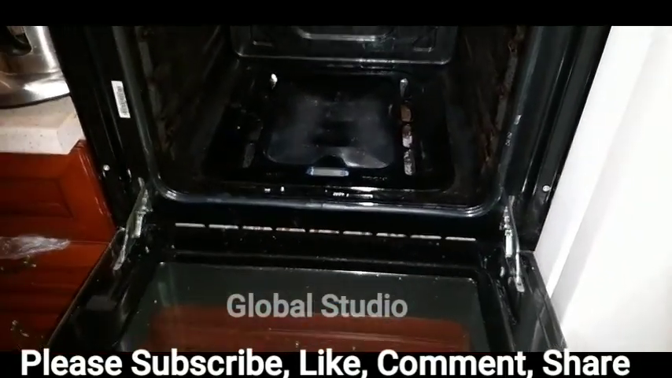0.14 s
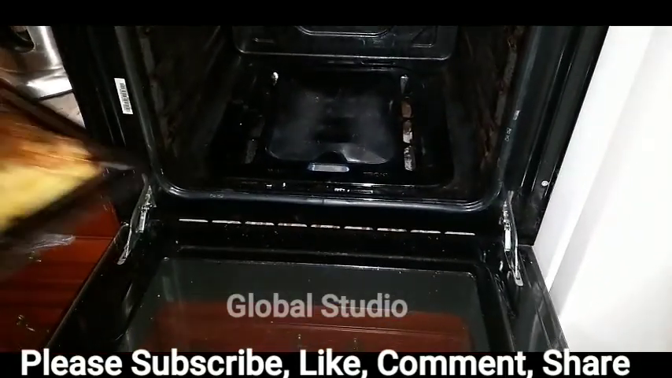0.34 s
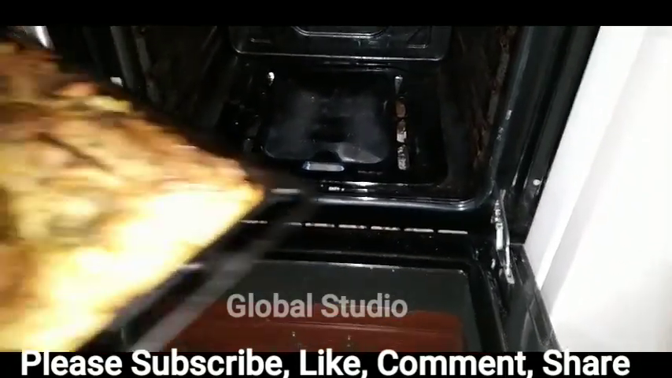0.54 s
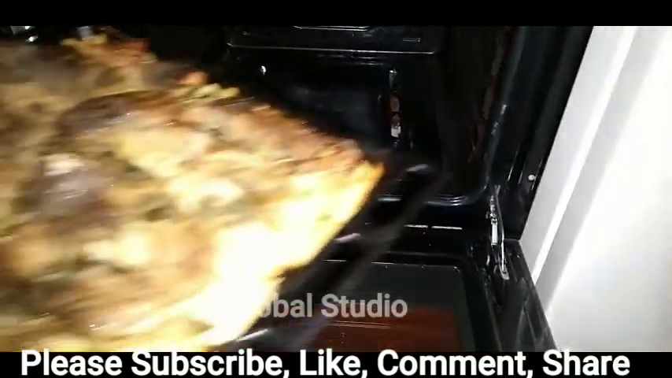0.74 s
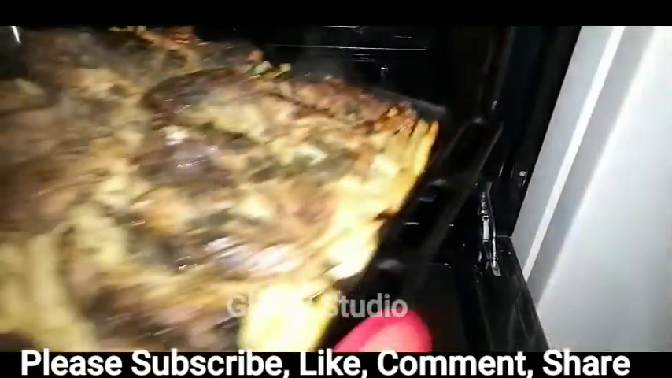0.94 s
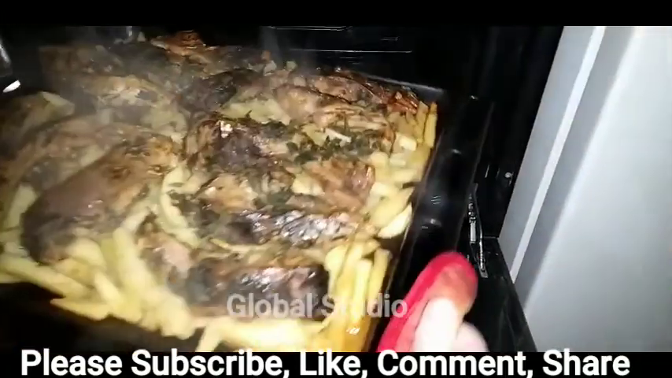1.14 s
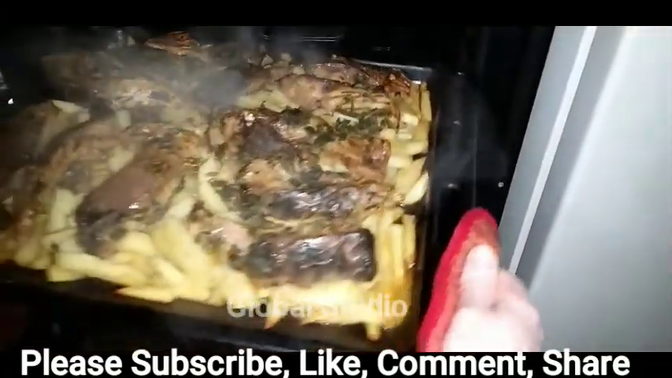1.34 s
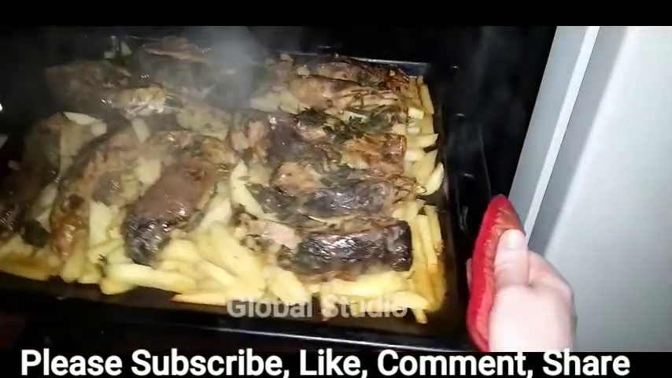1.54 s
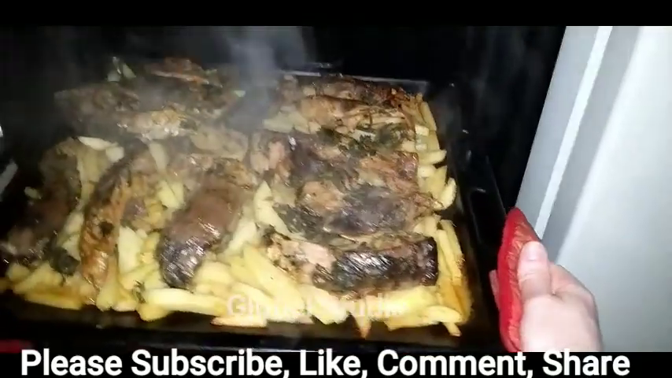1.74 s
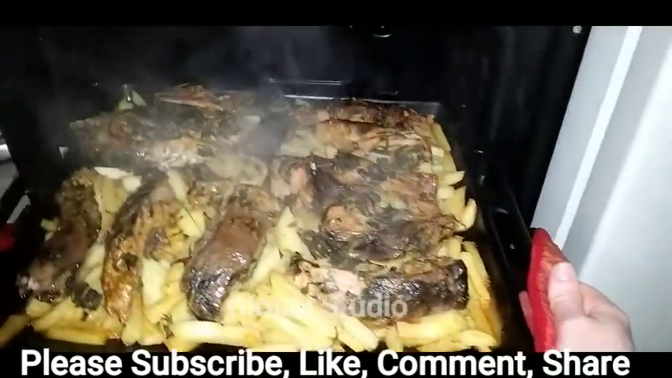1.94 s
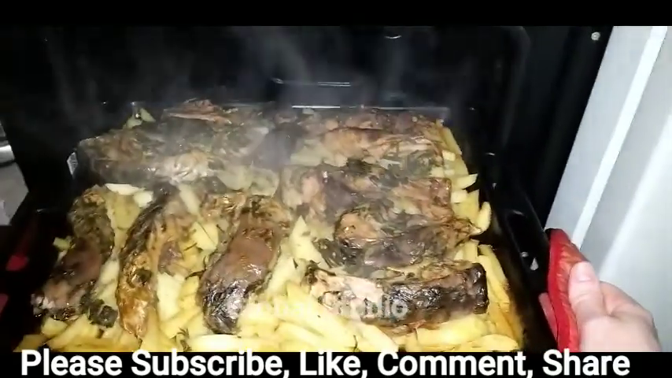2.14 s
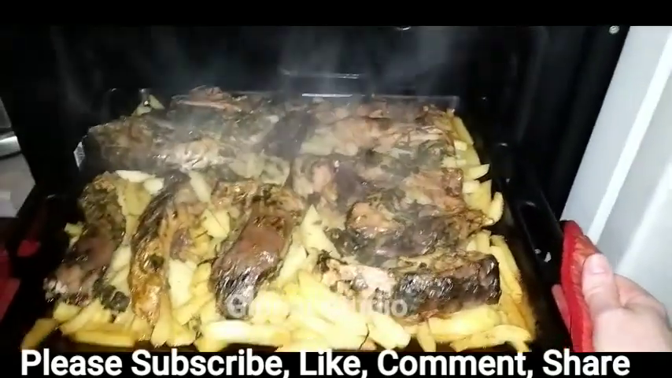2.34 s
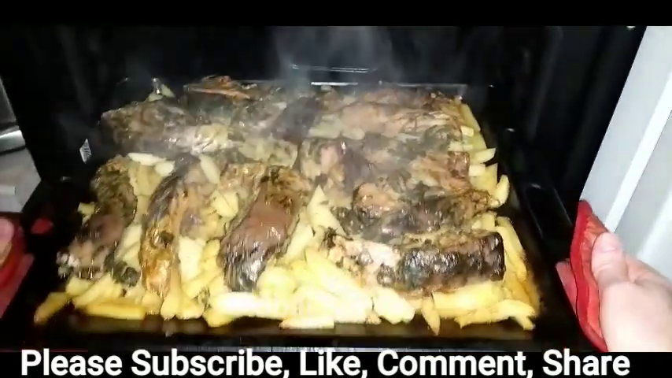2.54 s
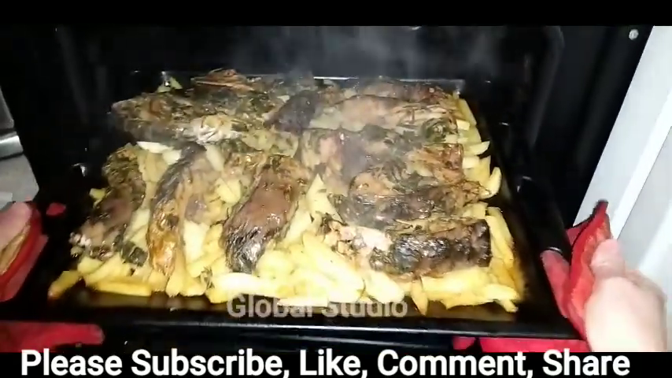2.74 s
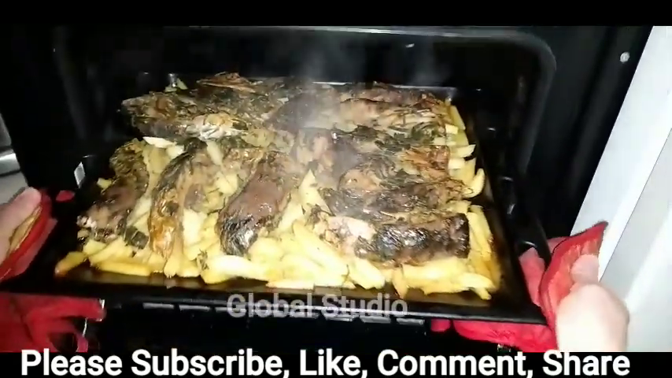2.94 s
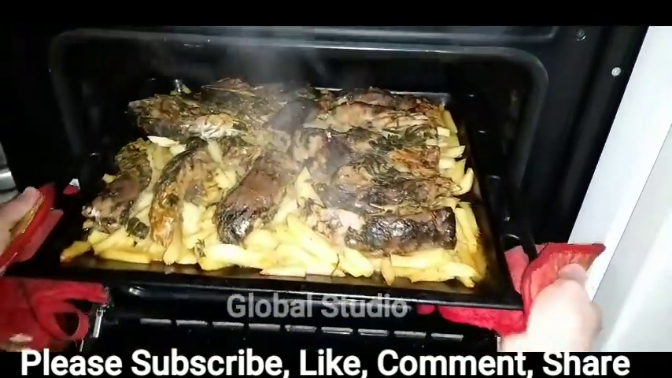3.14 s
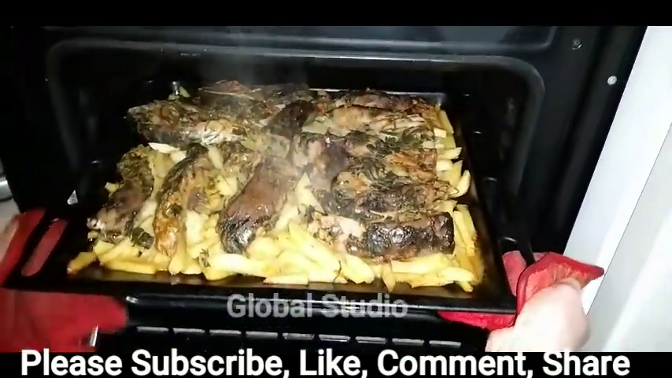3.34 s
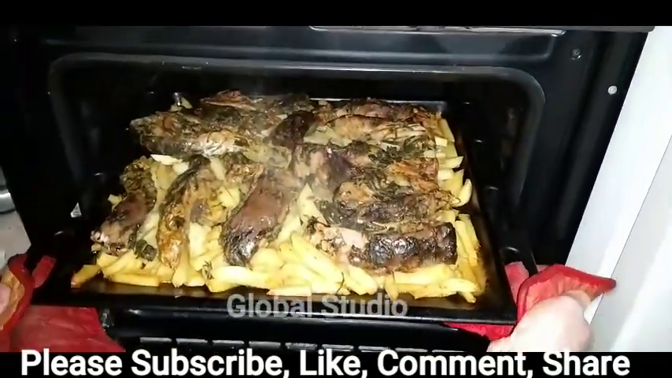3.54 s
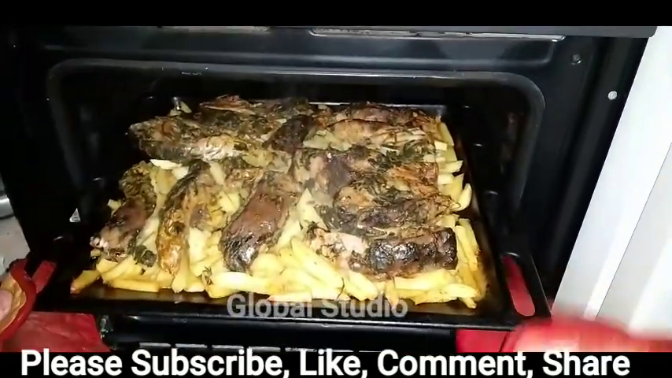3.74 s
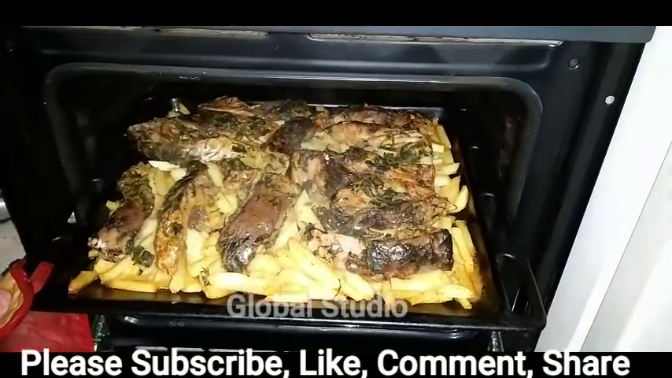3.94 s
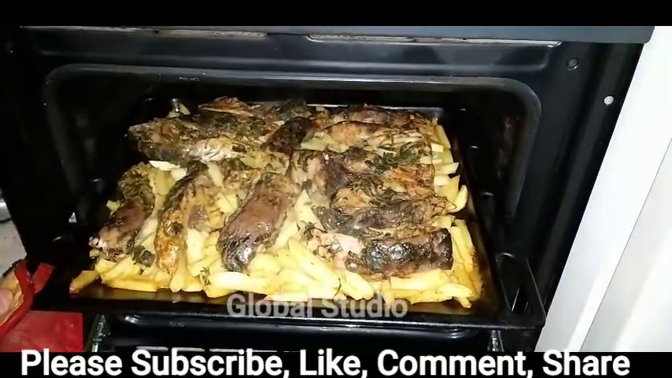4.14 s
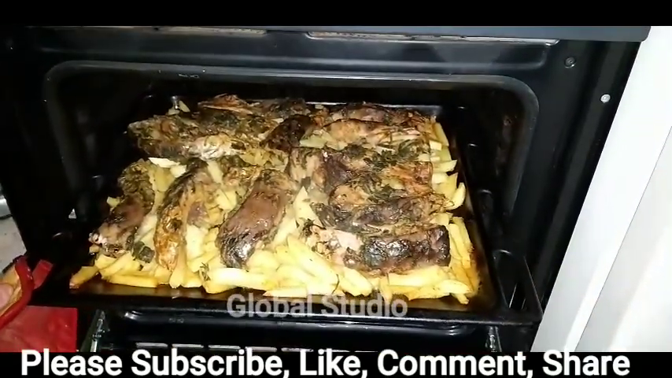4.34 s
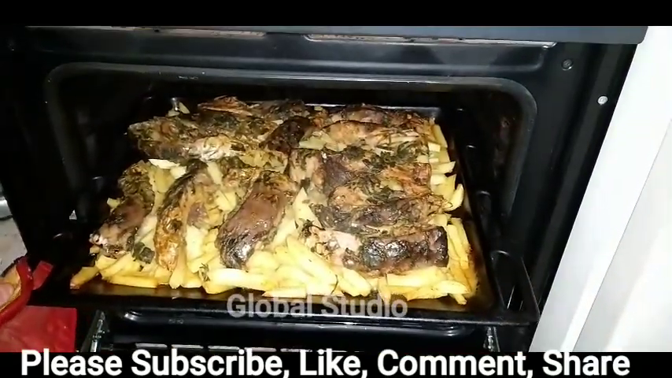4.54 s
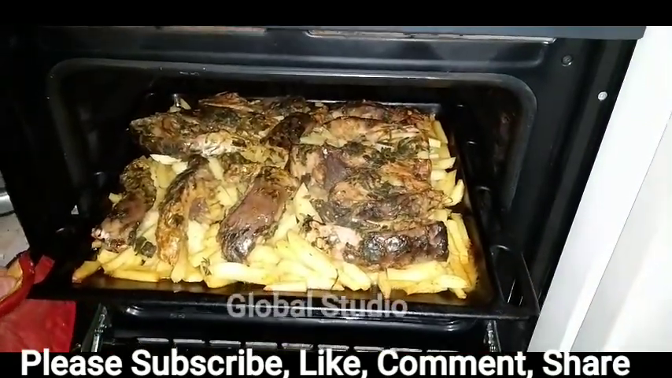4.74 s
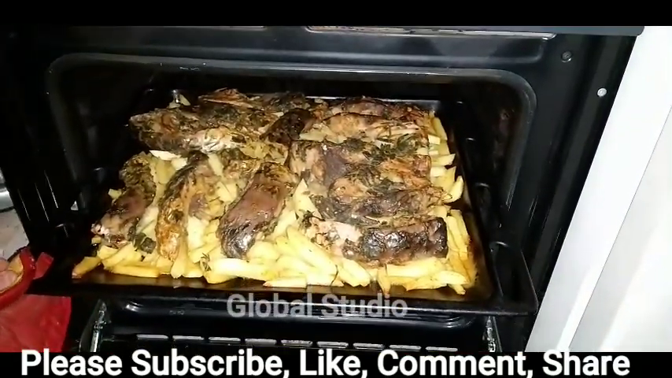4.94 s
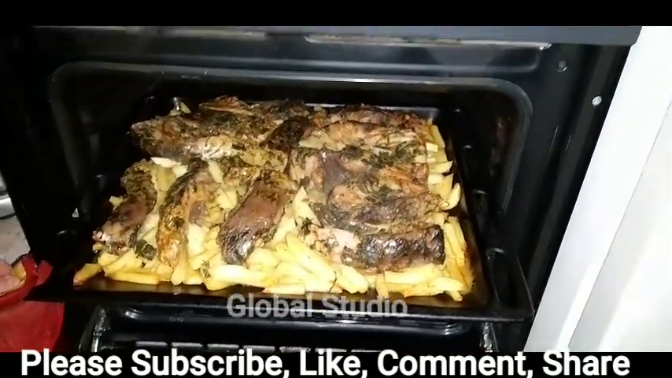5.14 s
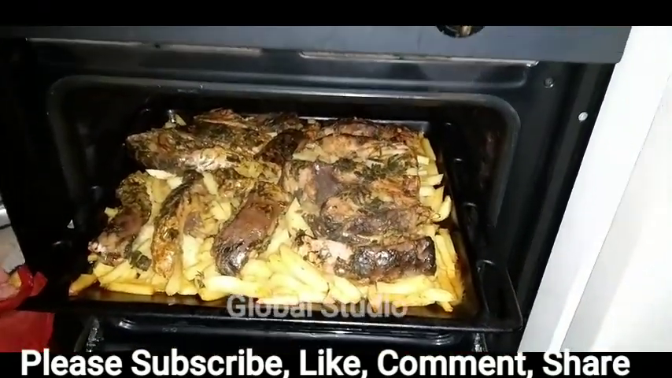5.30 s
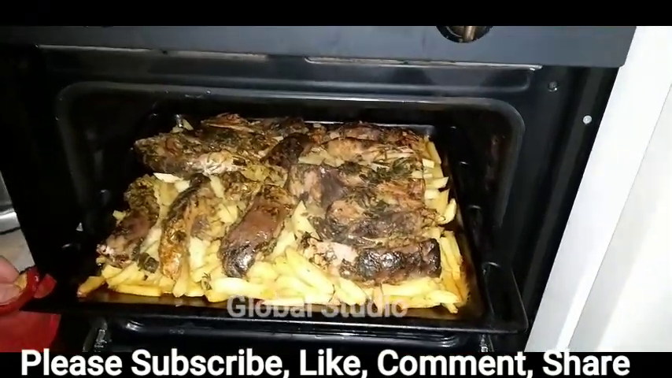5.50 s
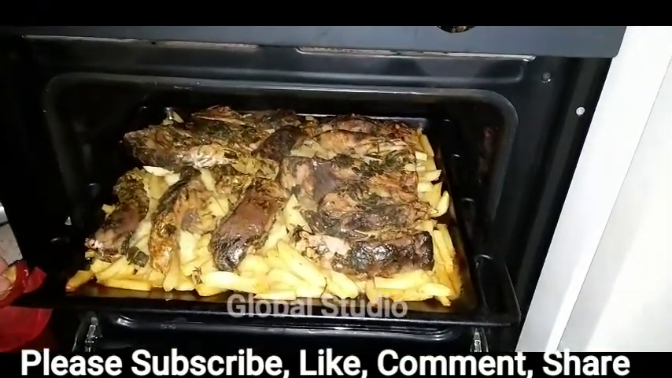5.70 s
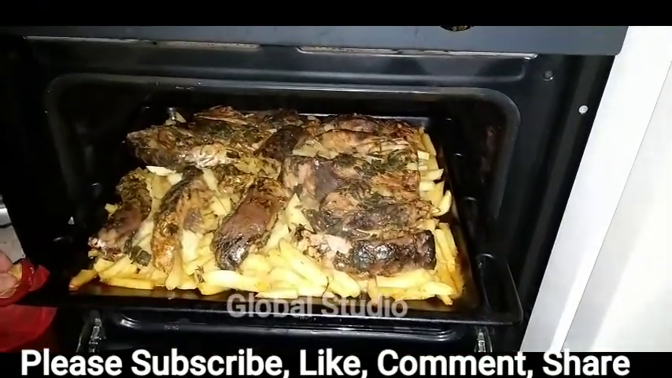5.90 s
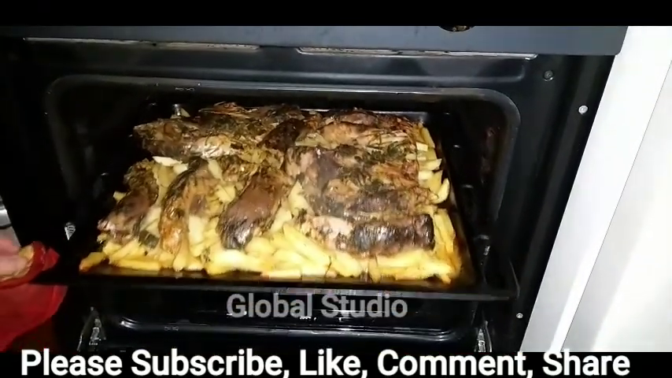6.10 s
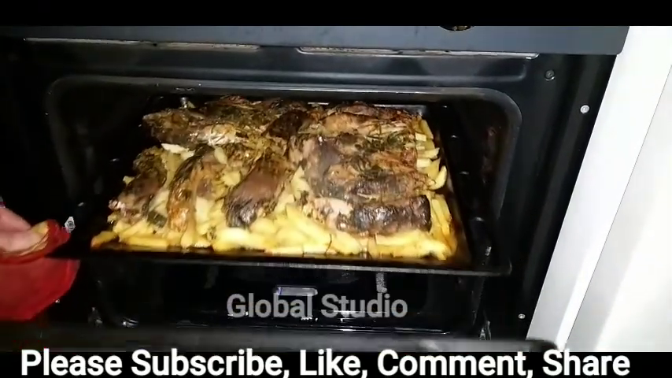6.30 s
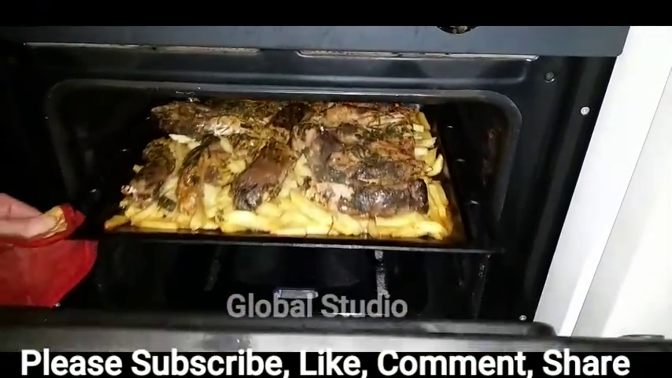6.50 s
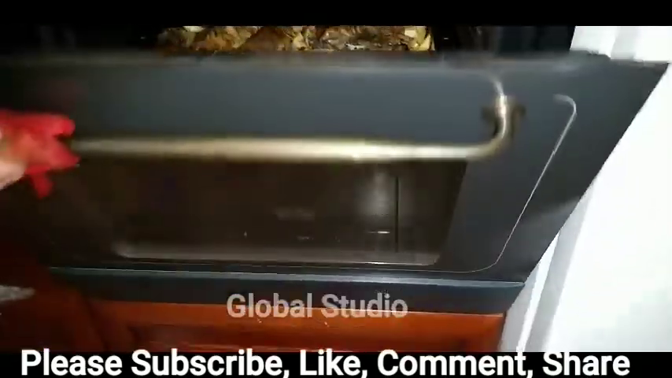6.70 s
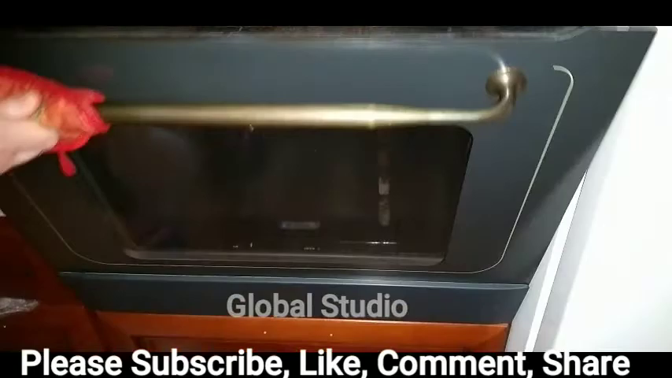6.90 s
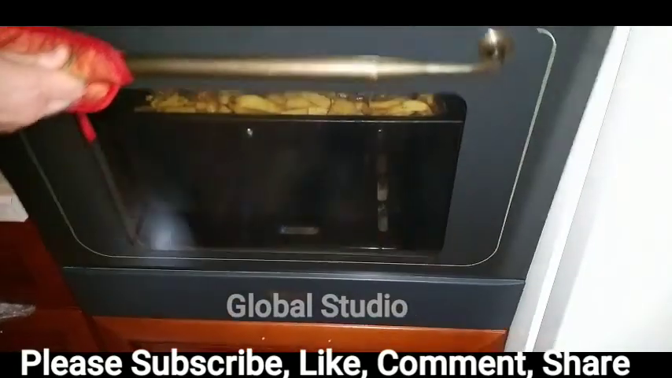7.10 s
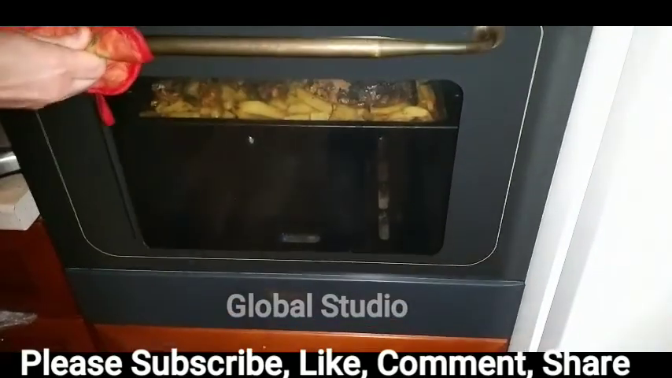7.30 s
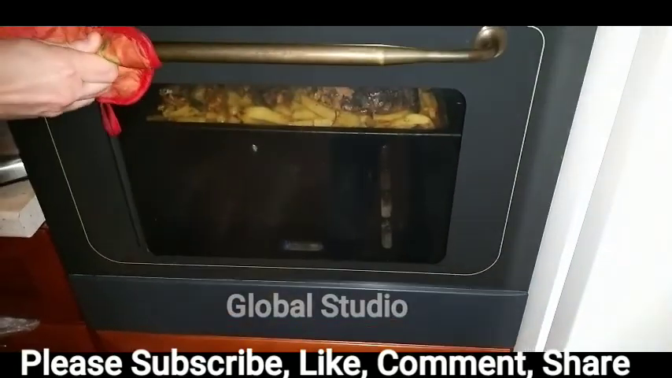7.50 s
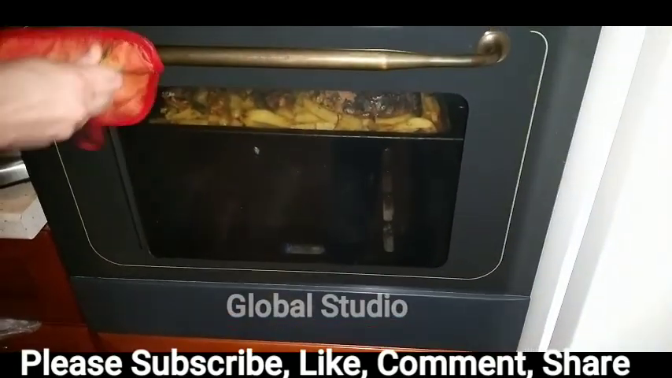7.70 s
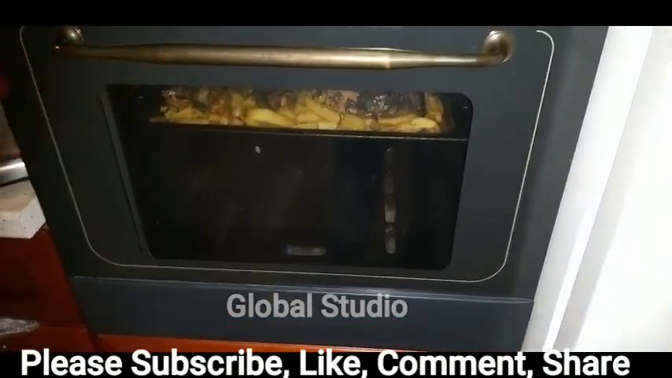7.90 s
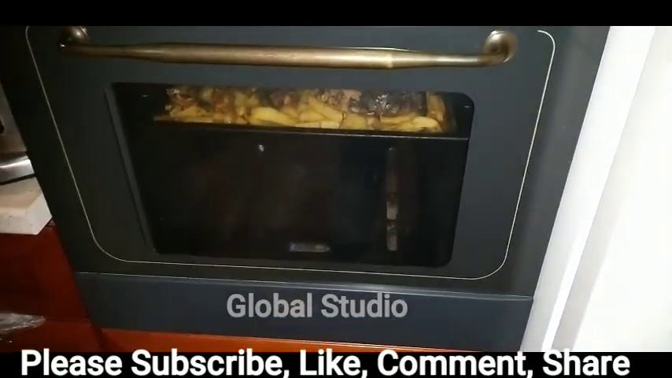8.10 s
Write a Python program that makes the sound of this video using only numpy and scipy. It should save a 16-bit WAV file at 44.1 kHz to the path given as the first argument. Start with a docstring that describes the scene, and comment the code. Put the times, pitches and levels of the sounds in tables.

```python
"""Baking tray into a hot oven

A loaded tray is knocked onto the runners and scrapes home in two spells: modes and dense clatter ring
at each blow, and slips of enamel drive ringing noise. Mitts rustle as brushed bands of noise, hinges
clunk, panels thud, and the sprung door slams and rattles in a small kitchen. Fan hum of wavering sines
sinks away as the door closes; its air and swish are shaped noise. Two close-set microphones listen."""
import sys
import numpy as np
from scipy import signal
from scipy.fft import rfft, irfft, next_fast_len
from scipy.io import wavfile

SR = 44100
rng = np.random.default_rng(int(sys.argv[2]) if len(sys.argv) > 2 else 0)


def output_pcm(signal):
    """Save a mono or channel-first signal as 16-bit PCM at the path in sys.argv[1].

    Samples are clipped to [-1, 1] before scaling.
    """
    pcm = np.clip(np.atleast_2d(signal).T, -1, 1) * 32767
    wavfile.write(sys.argv[1], SR, np.round(pcm).astype(np.int16))


N = 359591
TIME = np.arange(N) / SR  # s

# thump, clang, clink and tick registers: lower_edge_hz, upper_edge_hz
REGISTERS = [(25, 400), (400, 2150), (2150, 6000), (6000, 17000)]
MIC_GAP_M, SOUND_M_PER_S = 0.11, 343
DIRECT_SHARE = 0.067  # part of the sound that reaches both microphones alike
BASS_MONO_HZ = 213  # below this the two microphones hear nearly the same


def amp(db):
    """Amplitude factor of a level in dB."""
    return 10 ** (np.asarray(db) / 20)


def evened(x):
    """Signal scaled to unit RMS."""
    return x / np.sqrt(np.mean(x ** 2) + 1e-30)


def add(mix, start_s, sound):
    """Lay a sound into the mix, cut off at the end."""
    part = mix[:, round(start_s * SR):][:, :sound.shape[-1]]
    part += sound[..., :part.shape[-1]]


def colour(hz, spectrum, peaks=()):
    """Gain of a broad spectrum with resonances standing out of it."""
    f, db = np.transpose(spectrum)
    broad_db = np.interp(np.log(hz + 1), np.log(f + 1), db)
    humps_db = sum(height / (1 + (2 * (hz - centre) / width) ** 2) for centre, width, height in peaks)
    return amp(broad_db + humps_db)


def ragged(hz, depth_db, spacing_hz):
    """Gain of a thin panel's many small resonances, scattered at random."""
    heights_db = depth_db * np.clip(rng.standard_normal(2048), -2, 2)
    return amp(np.interp(hz / spacing_hz, np.arange(len(heights_db)), heights_db))


def register(hz, index):
    """Gain of one register, with soft edges."""
    low, high = REGISTERS[index]
    return 1 / np.sqrt((1 + (low / (hz + 1)) ** 8) * (1 + (hz / high) ** 8))


def noise(gain):
    """Coloured noise, partly direct and partly from all sides: fully alike at both microphones only in the bass."""
    hz = np.linspace(0, SR / 2, len(gain))
    diffuse = np.sinc(2 * hz * MIC_GAP_M / SOUND_M_PER_S)
    treble = hz ** 2 / (hz ** 2 + BASS_MONO_HZ ** 2)
    apart = (1 - DIRECT_SHARE) * (1 - diffuse) * treble
    a, b, c, d = rng.standard_normal((4, len(gain)))
    mid = (a + 1j * b) * np.sqrt(2 - apart)
    side = (c + 1j * d) * np.sqrt(apart)
    return evened(irfft(np.array([mid + side, mid - side]) * gain))


def wander(rate):
    """Slow chance of unit size, changing about rate times a second."""
    hz = np.fft.rfftfreq(4096, N / 4096 / SR)
    slow = irfft(rfft(rng.standard_normal(4096)) / (1 + (hz / rate) ** 4))
    return np.interp(TIME, np.linspace(0, N / SR, len(slow)), evened(slow))


def curve(rows, index):
    """One column of a curve over time, holding its end values."""
    rows = np.array(rows)
    return np.interp(TIME, rows[:, 0], rows[:, index])


def swell(peak_s, length_s):
    """A rub swells smoothly to its height and trails off."""
    t = (TIME - peak_s) / length_s
    rise, fall = 0.48, 0.76  # shares of the length
    return np.exp(-np.minimum(np.where(t < 0, (t / rise) ** 2, t / fall), 20))


def long_bins():
    """Frequencies in Hz for noise that lasts the whole scene."""
    return np.linspace(0, SR / 2, next_fast_len(N // 2 + 1) + 1)


def fan(air_db=-55, waver_hz=1.98, throb_db=3.0):
    """Wavering, throbbing hum lines over air that rushes through the oven's cavity."""
    # hum before its common fade: pitch_hz, level_db
    lines = [(96.9, -61.5), (123.8, -68.5), (145.3, -60), (166.9, -62.5), (199.2, -65), (290.7, -67.5),
             (527.6, -66)]
    # balance of the rushing air: frequency_hz, level_db_per_hz
    air_tone = [(25, -17), (55, -20), (82, -6), (150, 1.5), (227, -8), (297, -15.5), (400, -18.5),
                (523, -15.5), (700, -26.5), (1000, -28), (1900, -32.5), (2700, -41.5), (8000, -43),
                (15500, -44)]
    # resonances of the oven's cavity: centre_hz, width_hz, height_db
    cavity = [(304.5, 23, 8), (587.3, 13, 11.5), (1030, 110, 2), (1480, 100, 7.5), (2110, 270, 2.5)]
    # push to the middle of the air, whose factor is then lowered by 1.5: time_s, level_db
    rush_push = [(0, 7), (1.2, 6), (2.2, 10), (3.6, 10), (6.6, 7), (7.05, 1.5), (7.8, 7)]
    hz = long_bins()
    hum = np.zeros(N)
    for pitch_hz, level_db in lines:
        level = amp(level_db + throb_db * wander(9.7))
        phase = 2 * np.pi * np.cumsum(pitch_hz + waver_hz * wander(9.4)) / SR
        hum += level * np.sin(phase)
    air = noise(colour(hz, air_tone, cavity))
    # the middle of the air, between 450 and 4500 Hz, swells and sinks
    middle = 1 / (1 + (450 / (hz + 1)) ** 4) / (1 + (hz / 4500) ** 4)
    rush = irfft(rfft(air) * middle)[:, :N]
    air = air[:, :N] + rush * (amp(curve(rush_push, 1)) - 1.5)
    # from 6.66 s the hum sinks away by 17 dB per s as the door closes
    hum_db = 1.5 - 17 * np.maximum(TIME - 6.66, 0)
    return amp(hum_db) * hum + amp(air_db) * air


def swish(turns_hz=24.1, depth=0.52, drift_per_s=6):
    """The fan wheel brushes the air unevenly, swishing once a turn in resonances that come and go."""
    # resonances of the swish: centre_hz, width_hz, level_db, drift_db
    resonances = [(1490, 107, -77, 3.5), (2120, 75, -87.5, 3.5), (6830, 1500, -82.5, 4.5)]
    hz = long_bins()
    turn = np.exp(depth * np.cos(2 * np.pi * turns_hz * TIME))
    bands = np.zeros((2, N))
    for centre, width, level_db, drift_db in resonances:
        level = amp(level_db + drift_db * np.clip(wander(drift_per_s), -2, 2))
        bands += level * noise(1 / (1 + (2 * (hz - centre) / width) ** 4))[:, :N]
    return evened(turn) * bands


def mitts(flutter_db=1.5, stir_db=0.5):
    """Cloth brushes in separate strokes of rasp and hiss, and stirs faintly between them."""
    # mitts and sleeves brush along: peak_s, length_s, level_db, extra_hiss_db
    rustles = [(0.495, 0.077, -84, 10), (0.713, 0.15, -71.5, -1), (0.95, 0.11, -80, 13),
               (1.34, 0.5, -83, 13.5), (1.85, .13, -55.5, -11.5), (3.588, 0.074, -55.5, -4.5),
               (3.694, 0.32, -67, 2), (3.928, 0.21, -63, -6), (4.386, 0.037, -62.5, 0),
               (4.632, 0.24, -67, -7), (5.147, 0.36, -72.5, -22), (5.465, 0.14, -67.5, -17),
               (5.754, 0.024, -65.5, -19), (7.718, 0.081, -57, -11), (8.14, 0.28, -61.5, -1)]
    # balance of rubbed cloth: frequency_hz, level_db_per_hz
    cloth = [(2000, 0.5), (3500, 2), (6000, -6.5), (9000, -11), (13000, -8), (15500, -12.5)]
    hz = long_bins()
    rasp, hiss = (noise(colour(hz, cloth) * register(hz, k))[:, :N] for k in (2, 3))
    # the faint stir lasts while the tray is handled
    handling = (TIME > 0.5) & (TIME < 6.6)
    stir = amp(-83 + stir_db * wander(2)) * handling
    rasp_power, hiss_power = stir ** 2, stir ** 2
    for peak_s, length_s, level_db, extra_hiss_db in rustles:
        power = (amp(level_db) * swell(peak_s, length_s)) ** 2
        rasp_power = rasp_power + power
        hiss_power = hiss_power + power * amp(extra_hiss_db) ** 2
    brushed = rasp * np.sqrt(rasp_power) + hiss * np.sqrt(hiss_power)
    return amp(flutter_db * wander(40)) * brushed


def blows(rows, modes, ring, decay, modes_db, lowest_hz, tick_db, spot_db=5.0, spot_width=0.66):
    """Each blow rings clear modes and a dense sheet-metal clatter, which the kitchen draws out."""
    t, hz = np.arange(2 ** 15) / SR, np.fft.rfftfreq(2 ** 15, 1 / SR)
    out = np.zeros((2, N))
    panel = ragged(hz, depth_db=2.5, spacing_hz=21.9)
    for k, (rise, t60, dense_db, room_db, room_t60) in enumerate(decay):
        low, high = REGISTERS[k]
        clear = np.zeros((2, len(t)))
        for f, db, life in modes:
            if low <= f < high:
                # each mode arrives from its own direction
                lag = np.array([[-.5], [.5]]) * rng.uniform(-1, 1) * MIC_GAP_M / SOUND_M_PER_S
                lag *= f / np.hypot(f, BASS_MONO_HZ)
                # it takes about a third of a cycle to get going
                envelope = amp(db - 60 * t / life) * (1 - np.exp(-3 * f * t))
                clear += envelope * np.sin(2 * np.pi * f * (t + lag))
        near = amp(dense_db) * np.exp(-np.log(1000) * t / t60) * (1 - np.exp(-t / rise))
        room = amp(room_db) * np.exp(-np.log(1000) * t / room_t60) * (1 - np.exp(-t / 0.0093))
        edges, fade = panel * register(hz, k), np.hypot(near, room)
        for start_s, strength_db, weight_db, hardness_db, spot_hz in rows:
            # weight adds thump; a hard contact adds clink and tick together
            hard_db = strength_db + hardness_db
            levels_db = (strength_db + weight_db, strength_db, hard_db, hard_db + tick_db)
            struck_spot = [(spot_hz, spot_width * spot_hz, spot_db)]
            dense = noise(edges * colour(hz, ring, struck_spot))
            add(out, start_s, amp(levels_db[k]) * (amp(modes_db) * clear + fade * dense))
    # the blows carry little deep bass
    thin = signal.butter(2, lowest_hz, "highpass", fs=SR, output="sos")
    return signal.sosfilt(thin, out)


def tray_knocks():
    """The loaded tray meets the runners and its sheet metal rings."""
    # blows: start_s, strength_db, extra_thump_db, extra_clink_db, favoured_spot_hz
    knocks = [(1.340, -26.5, 0.5, -22.5, 1050), (1.3435, -27, 9.5, -23, 970), (1.474, -41, 9.5, -24, 1050),
              (1.767, -37, 10, -27, 1220), (1.942, -43, 1, -9, 2000), (1.966, -42, 8, -12.5, 830),
              (2.081, -41, 9.5, 1.5, 1620), (2.316, -34, 11, -21, 970), (2.424, -42, 15.5, -16, 503),
              (2.639, -43, 2, -4.5, 1210), (2.789, -41, -12, -2.5, 1550), (3.112, -33.5, 3.5, -17.5, 1400),
              (3.201, -39.5, 4.5, -12.5, 595), (3.360, -40.5, 7, -9.5, 1980), (6.349, -38.5, 5, -1, 139)]
    # clear modes: pitch_hz, level_db, t60_s
    modes = [(68, -14, 0.75), (117, -7, 0.45), (135.8, 2, 0.28), (201.6, -5, 0.34), (239.4, -1.5, 0.16),
             (292, -11.5, 0.21), (477, -1, 0.18), (538, -3.5, 0.2), (723, -14, 0.15), (760, -13, 0.092),
             (816, -23, 0.47), (942, -8, 0.19), (1082, -2.5, 0.12), (1180, -0.5, 0.13), (1505, -6.5, .12),
             (2120, -11, 0.2), (3360, -2, .12), (4120, -3, .16)]
    # dense ringing between the modes: frequency_hz, level_db_per_hz
    ring = [(29, -50), (50, -36), (124, 3.5), (256, -3.5), (394, -15.5), (525, -15.5), (637, -14),
            (735, -10), (870, -21), (1190, -22.5), (1340, -15.5), (1970, -22), (2690, -29.5), (13400, -57),
            (15500, -54)]
    # dying of each register: rise_s, t60_s, level_db, room_level_db, room_t60_s
    decay = [(0.0019, 0.082, -0.5, -16.5, 0.87), (0.00066, 0.077, -0.5, -9.5, 0.39),
             (0.0011, 0.1, 4.5, -8.5, 0.46), (.001, 0.055, 6.5, -4, 0.33)]
    return blows(knocks, modes, ring, decay, modes_db=-7.0, lowest_hz=99, tick_db=-13,
                 spot_db=8, spot_width=0.4)


def friction(stroke, rumble_db, fall_db_per_s, hiss_db):
    """Rumble, grinding, rasp and hiss of one stroke: all follow the effort, and a biting edge grinds."""
    start, end = stroke[0][0], stroke[-1][0]
    effort, bite = curve(stroke, 1), curve(stroke, 2)
    # the rumble dies as more of the tray rests on the runners
    rumble = rumble_db - fall_db_per_s * np.clip(TIME - start, 0, end - start)
    levels_db = [effort + rumble, effort + bite, effort, effort + hiss_db]
    return amp(levels_db) * ((TIME >= start) & (TIME < end))


def scrape(slips_per_s=600, spread_db=2.0, judder_db=1.0, smooth=1.0, contacts=3):
    """Enamel catches and slips on the runners; each slip feeds the tray's ringing, over a smooth rubbing."""
    # tray pushed in, eased along, then driven home by the rising door: time_s, effort_db, edge_bite_db
    push = [(2.44, -63.5, 9), (2.55, -65, 7.5), (2.61, -55.5, 4.5), (2.74, -53.5, 7.5), (2.85, -52, 7),
            (2.875, -60.5, 7), (2.9, -50.5, 1), (2.96, -62, 3)]
    ease = [(2.96, -65.5, 7), (3.07, -61, -2), (3.25, -59.5, -9), (3.32, -59, -2), (3.45, -64, -1),
            (3.52, -71, -10)]
    home = [(5.9, -72.5, -4), (6.0, -56.5, 8), (6.07, -52, 5.5), (6.135, -50.5, 12.5), (6.19, -55, 7.5),
            (6.24, -54.5, 5.5), (6.31, -53, 4), (6.41, -45.5, -4), (6.47, -49.5, -2), (6.568, -55.5, 1.5)]
    # balance of the sliding: frequency_hz, level_db_per_hz
    slide_tone = [(60, -30), (100, 2), (160, 0.5), (260, -9.5), (380, -9), (560, -7), (700, -9.5),
                  (1100, -10.5), (2200, -15), (3200, -14), (4400, -18.5), (5600, -26.5), (8200, -36.5),
                  (12500, -31), (15500, -35)]
    # tray resonances that the sliding brings out: centre_hz, width_hz, height_db
    slide_peaks = [(298, 47, 5), (566.4, 13, 8.5), (969, 31, 6.5), (1250, 35, 8.5), (1605, 72, 8),
                   (2074, 140, 7), (3122, 98, 2.5), (3800, 220, 2), (3940, 170, 2.5), (7020, 170, 6.5)]
    drive = friction(push, rumble_db=21.1, fall_db_per_s=30, hiss_db=0)
    drive = drive + friction(ease, rumble_db=7.7, fall_db_per_s=0, hiss_db=1.8)
    drive = drive + friction(home, rumble_db=15, fall_db_per_s=47, hiss_db=-2.4)

    hz = np.fft.rfftfreq(2 ** 16, 1 / SR)
    slip_sizes = amp(spread_db * np.minimum(rng.exponential(1, N), 4))
    slips = slip_sizes * (rng.random(N) < slips_per_s / SR)
    judder = amp(judder_db * wander(6.3))
    power = (evened(slips) ** 2 + smooth) / (1 + smooth) * judder ** 2
    # the load shifts among a few points of contact, each with resonances of its own
    loads = np.array([amp(9 * wander(9)) for _ in range(contacts)])
    loads /= np.linalg.norm(loads, axis=0)
    tone = colour(hz, slide_tone, slide_peaks)
    tones = [tone * ragged(hz, depth_db=5.5, spacing_hz=40.46) for _ in range(contacts)]
    trims_db, ring_t60_s = (1, 1, 1.5, 1.5), (.12, .05, .02, .008)  # one per register
    out = np.zeros((2, N))
    for k, (trim_db, t60) in enumerate(zip(trims_db, ring_t60_s)):
        keep = np.exp(-2 * np.log(1000) / (t60 * SR))  # share of the ringing energy left after one sample
        energy = signal.lfilter([1 - keep], [1, -keep], power * drive[k] ** 2 + 1e-20)
        ringing = np.zeros((2, N))
        for load, contact_tone in zip(loads, tones):
            loop = noise(contact_tone * register(hz, k))
            ringing += load * loop.take(np.arange(N), axis=1, mode="wrap")
        out += amp(trim_db) * np.sqrt(energy) * ringing
    return out


def catches():
    """The edge catches on a runner: brief rough squeals, as fast slips keep one tray resonance going."""
    # squeals: peak_s, length_s, pitch_hz, width_hz, level_db
    squeals = [(2.735, 0.053, 573, 110, -48), (2.812, 0.052, 1230, 150, -47),
               (2.907, 0.044, 1194, 190, -44), (2.91, 0.05, 2830, 130, -57), (2.782, 0.12, 4130, 200, -57),
               (6.013, 0.046, 576, 60, -43), (6.052, 0.031, 595, 60, -40.5), (6.15, 0.036, 1016, 70, -42),
               (6.39, 0.048, 1980, 300, -45), (6.45, 0.033, 970, 70, -49)]
    hz, out = np.fft.rfftfreq(2 ** 15, 1 / SR), np.zeros((2, N))
    for peak_s, length_s, pitch_hz, width_hz, level_db in squeals:
        ringing = noise(1 / (1 + (2 * (hz - pitch_hz) / width_hz) ** 2))
        ringing = ringing.take(np.arange(N), axis=1, mode="wrap")
        out += amp(level_db) * swell(peak_s, length_s) * ringing
    return out


def bumps():
    """Soft bumps of cabinet and door: a few swelling and fading cycles of a large panel."""
    # bumps: start_s, level_db, pitch_hz, length_s
    thuds = [(3.765, -39, 151, 0.023), (4.381, -42.5, 82.5, 0.06), (6.568, -50, 290, 0.022),
             (7.342, -29, 72, 0.051), (7.438, -41.5, 67.5, 0.097)]
    out = np.zeros((2, N))
    for start_s, level_db, pitch_hz, length_s in thuds:
        t = np.arange(0, length_s, 1 / SR)
        envelope = amp(level_db) * np.sin(np.pi * t / length_s) ** 2
        add(out, start_s, envelope * np.sin(2 * np.pi * pitch_hz * t))
    return out


def hinge_clunks():
    """The hinges creak and take up the door's weight, ringing as small blows."""
    # blows: start_s, strength_db, extra_thump_db, extra_clink_db, favoured_spot_hz
    clunks = [(4.017, -50, 8.5, -4, 2350), (4.034, -41.5, 0, -9.5, 1510), (4.663, -38.5, 7, -21, 1500),
              (4.677, -43, -7, -10.5, 800), (6.626, -33, 4, -14.5, 664), (6.652, -38, 3.5, -19.5, 308),
              (7.05, -55.5, -2, -32, 815)]
    # clear modes: pitch_hz, level_db, t60_s
    modes = [(155, -3, 0.078), (296.7, -2.5, 0.28), (520, -17, 0.15), (661, -5, 0.23), (874, -10, 0.16),
             (1693, -42, 0.09)]
    # dense ringing between the modes: frequency_hz, level_db_per_hz
    ring = [(47, -35), (80, -13), (142, -17.5), (206, -31), (281, 6), (374, -9.5), (635, -8), (944, -14),
            (1430, -18.5), (2720, -35.5), (3870, -36), (12400, -52), (15500, -54)]
    # dying of each register: rise_s, t60_s, level_db, room_level_db, room_t60_s
    decay = [(0.0041, 0.086, -5, -14, 0.39), (0.0061, 0.063, 4, -14.5, 0.48),
             (0.0011, 0.086, 7.5, -5.5, 0.45), (.001, 0.093, -0.5, -9.5, 0.41)]
    return blows(clunks, modes, ring, decay, modes_db=-5.0, lowest_hz=159, tick_db=-5.5)


def door_slam():
    """The sprung door lands edge by edge, rattles and is let go, each contact ringing its panels."""
    # blows: start_s, strength_db, extra_thump_db, extra_clink_db, favoured_spot_hz
    contacts = [(7.2382, -12.5, 6, -32, 302), (7.2417, -15, 3, -17, 565), (7.2447, -9, -1.5, -18, 700),
                (7.316, -32.5, 13.5, -19, 300), (7.329, -22.5, -13, -15.5, 1890),
                (7.3475, -23.5, 2, -7, 7100), (7.482, -63.5, -5, 14.5, 8400), (7.701, -59.5, 16, 10, 3050),
                (8.047, -53.5, 5, -1, 3630)]
    # clear modes: pitch_hz, level_db, t60_s
    modes = [(31, -28.5, 2.3), (73, -29, .6), (102.5, -21, 0.75), (176, -21, 0.085), (240, 2.5, 0.1),
             (286, 2, 0.04), (315, -17.5, 0.36), (470, -18, 0.14), (517, -8, 0.38), (569, 6.5, 0.037),
             (606, -20, 0.11), (667, -15, 0.067), (823, -15, 0.12), (1117, -7, 0.082), (3290, 1.5, 0.066),
             (3800, 2, 0.084)]
    # dense ringing between the modes: frequency_hz, level_db_per_hz
    ring = [(18, -43), (30, -35), (97, 5), (152, -7), (299, -7), (379, -18), (420, -13), (479, -13),
            (532, -10), (970, -19.5), (2990, -24.5), (3230, -23.5), (5590, -34), (13600, -42.5),
            (15500, -48)]
    # dying of each register: rise_s, t60_s, level_db, room_level_db, room_t60_s
    decay = [(0.0026, 0.052, -10, -16, 0.57), (0.0021, 0.095, -7.5, -18, 0.49),
             (0.00079, 0.082, 2, -12.5, 0.53), (0.0011, 0.025, 5.5, -10.5, 0.3)]
    return blows(contacts, modes, ring, decay, modes_db=-6.5, lowest_hz=73, tick_db=-6.5)


def scene():
    """Sum of the fan, the cloth, the tray and the oven's metal."""
    air = fan() + swish()
    tray = tray_knocks() + scrape() + catches()
    oven = bumps() + hinge_clunks() + door_slam()
    return air + mitts() + tray + oven


def record(dry):
    """Full scale caps the peaks; then a steep low-pass sets the band limit."""
    capped = np.clip(dry, -1, 1)
    band_limit = signal.firwin(511, 15600, window=("kaiser", 9), fs=SR)  # edge in Hz
    return signal.oaconvolve(capped, band_limit[None], "same")


dry = scene()
out = record(dry)
output_pcm(out)
```